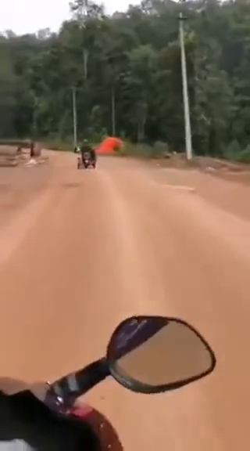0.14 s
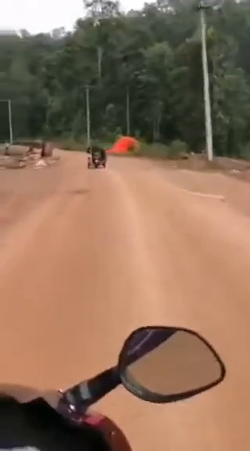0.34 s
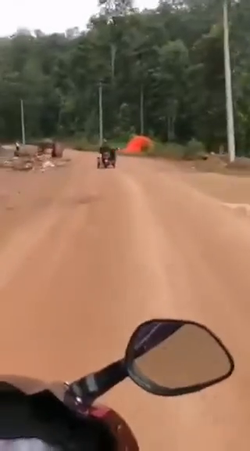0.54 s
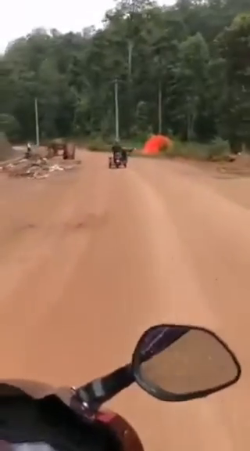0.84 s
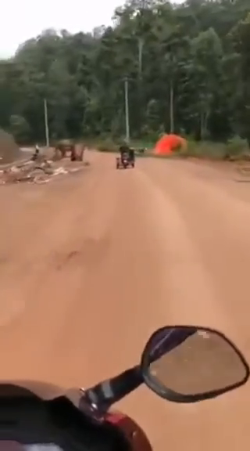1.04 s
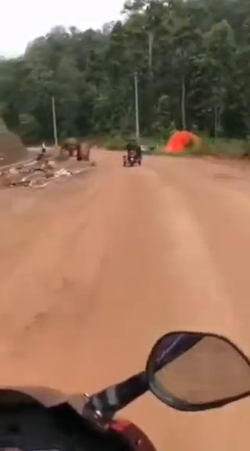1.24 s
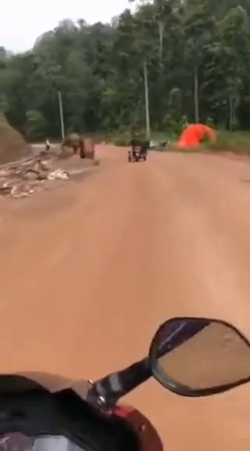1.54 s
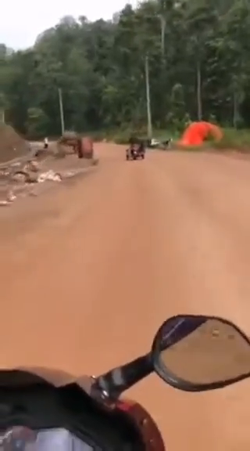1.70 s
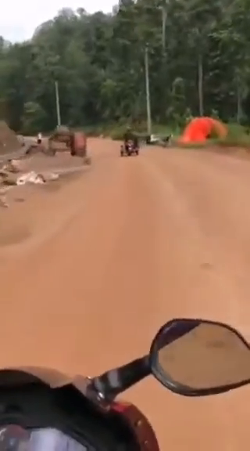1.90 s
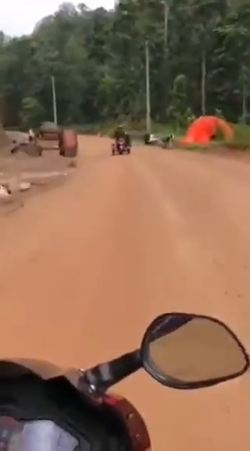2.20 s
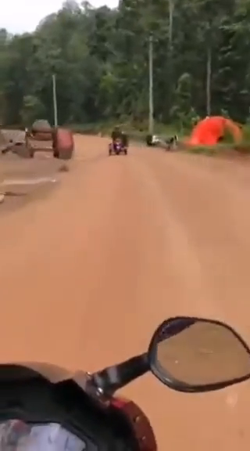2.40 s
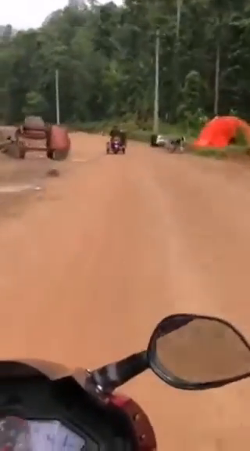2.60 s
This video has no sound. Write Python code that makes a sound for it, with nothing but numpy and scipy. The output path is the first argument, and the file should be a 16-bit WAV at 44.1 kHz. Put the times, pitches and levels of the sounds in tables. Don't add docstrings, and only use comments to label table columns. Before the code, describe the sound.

Rough gusts thud and crackle on an exposed phone microphone, outdoors on a dirt road. A small motorcycle engine buzzes underneath, easing off midway and pulling gently near the end, with tyre hiss and thin squeaks.

```python
import sys
import numpy as np
from scipy import signal
from scipy.fft import rfft, irfft, next_fast_len
from scipy.io import wavfile
from scipy.ndimage import uniform_filter1d, map_coordinates

SR = 44100
rng = np.random.default_rng(int(sys.argv[2]) if len(sys.argv) > 2 else 0)


def gain_from_db(level_db):
    decades = np.asarray(level_db, float) / 20
    return 10 ** decades


def wrap_up_sound(samples):
    columns = np.atleast_2d(samples).T
    tamed = np.clip(columns, -1, 1)
    steps = np.round(tamed * 32767).astype(np.int16)
    wavfile.write(sys.argv[1], SR, steps)


N = 121275


def unit(x):
    return x / np.sqrt(np.mean(x ** 2) + 1e-20)


def along(points, hz):
    f, v = np.transpose(points)
    return np.interp(np.log(hz + 1), np.log(f + 1), v)


def curves(rows):
    s, *columns = np.transpose(rows)
    return [np.interp(np.arange(N) / SR, s, column) for column in columns]


def wobble(rate):
    return map_coordinates(rng.standard_normal(2000), [np.arange(N) * rate / SR])


def filtered(x, response):
    m = next_fast_len(N + SR // 2)
    return irfft(rfft(x, m) * response(np.fft.rfftfreq(m, 1 / SR)), m)[:N]


def resonances(table):
    def response(f):
        total = 0
        for k, (centre, width, db) in enumerate(table):
            mode = 1j * f * width / (centre * centre - f * f + 1j * f * width)
            total = total + (-1) ** k * gain_from_db(db) * mode
        return total
    return response


def smoothed(x, first, second):
    return uniform_filter1d(uniform_filter1d(x, size=first), size=second)


def rush(spectrum, patchy_db):
    z = signal.stft(rng.standard_normal(N), nperseg=512)[2]
    field = uniform_filter1d(rng.standard_normal(z.shape), size=6, axis=0)
    field = uniform_filter1d(field, size=12, axis=1)
    x = signal.istft(z * gain_from_db(patchy_db * unit(field)), nperseg=512)[1][:N]
    return unit(filtered(x, lambda hz: gain_from_db(along(spectrum, hz))))


def superposed(seconds, wave):
    at = np.clip(np.round(seconds * SR).astype(int), 0, N)
    return np.bincount(at.ravel(), wave.ravel(), N + 1)[:N]


def chirps(s, db, start_hz, fall_s):
    end_hz = 85
    peak, tail = 2.1, 1.7
    t = np.arange(SR // 25)[None] / SR
    s, db, start_hz, fall_s = [np.asarray(v)[:, None] for v in (s, db, start_hz, fall_s)]
    turns = end_hz * t + (start_hz - end_hz) * fall_s * (1 - np.exp(-t / fall_s))
    u = t / fall_s
    rise = np.sin(.5 * np.pi * np.minimum(u / peak, 1))
    shape = np.where(u < peak, rise, np.exp(-(u - peak) / tail))
    rough = unit(smoothed(rng.standard_normal((len(s), 2, t.size)), 90, 70))
    turns = turns + .055 * rough[:, 0]
    shape = shape * gain_from_db(1.8 * rough[:, 1]) * np.cos(.5 * np.pi * t / t.max())
    wave = gain_from_db(db) * shape * np.sin(2 * np.pi * (turns + rng.random(s.shape)))
    return superposed(s + t, wave)


def engine():
    # (time [s], firing rate [1/s], level [dB])
    throttle = [
        (0, 30.7, -31),
        (.2, 34.8, -30.5),
        (.6, 32.1, -28.5),
        (1.1, 35.3, -28),
        (1.2, 34, -41.5),
        (1.7, 27.4, -44.5),
        (2.25, 27, -44),
        (2.4, 32, -30.5),
        (2.75, 21.3, -44.5),
    ]
    rate, throttle_db = curves(throttle)
    cycle = np.cumsum(rate * (1 + .0034 * wobble(30))) / SR
    thump = exhaust_note(cycle, throttle_db)
    return gain_from_db(throttle_db) * thump + gas_noise(cycle) + clatter(cycle, throttle_db)


def exhaust_note(cycle, throttle_db):
    # (centre [Hz], width [Hz], level [dB])
    modes = [(61, 18.5, 8.5), (158, 63, -5.5), (224.6, 20, 2), (422, 18.6, -1), (512.5, 57, -4),
             (858, 89, -7.5), (1178, 82, -5)]
    # (multiple, level over the thump [dB])
    orders = [(2, -2.5), (4, -12.5), (7, -2.5), (12, -9.5), (15, -9.5), (33, -9), (35, -15.5)]
    fire = np.diff(np.floor(cycle), prepend=0) * gain_from_db(1.9 * wobble(29))
    thump = unit(filtered(fire, resonances(modes)))
    below_full_db = throttle_db - throttle_db.max()
    for k, db in orders:
        order_db = db + 2 * wobble(5.2) + .8 * (k > 2) * below_full_db
        thump += gain_from_db(order_db) * np.sin(2 * np.pi * k * cycle + k)
    return thump


def gas_noise(cycle):
    # (centre [Hz], width [Hz], level [dB])
    upper_modes = [(1150, 20, -2.5), (1476, 38, -6.5), (1730, 47, -4.5), (2048, 53, -9.5)]
    swell = np.exp(.29 * np.cos(2 * np.pi * cycle))
    gas = unit(filtered(rng.standard_normal(N) * swell, resonances(upper_modes)))
    return gas * gain_from_db(-39.5 + 1.6 * wobble(7))


def clatter(cycle, throttle_db):
    # (frequency [Hz], level [dB])
    spectrum = [(1500, -36.5), (2500, 4.5), (4800, -30), (6950, -5), (9000, -1.5)]
    swell = np.exp(.54 * np.cos(2 * np.pi * cycle) + .15 * np.cos(4 * np.pi * cycle))
    noise = unit(rush(spectrum, patchy_db=1.6) * swell)
    load_db = .35 * (throttle_db - throttle_db.mean())
    return gain_from_db(-40 + load_db) * noise


def wind():
    # (time [s], strength [dB])
    gusts = [(0, -18.5), (.06, -33), (.11, -15), (.24, -27), (.47, -17.5), (.6, -31.5), (.69, -14.5),
             (.8, -37), (1.14, -22.5), (1.36, -17), (1.44, -15.5), (1.48, -52), (1.74, -21.5), (1.93, -22),
             (1.99, -35), (2.2, -14.5), (2.41, -22.5), (2.54, -17.5)]
    gust_db, = curves(gusts)
    total = buffeting(gust_db) + small_eddies(gust_db) + port_flaps() + big_pops()
    return filtered(total, lambda f: 1 / (1 + (f / 1700) ** 6))


def buffeting(gust_db):
    # (frequency [Hz], level [dB])
    spectrum = [(20, -31.5), (40, 13), (70, 5.5), (130, -5), (250, -14), (500, -27.5), (1500, -50)]
    body = filtered(rush(spectrum, patchy_db=-1.5), lambda f: 1 / (1 + (f / 500) ** 4))
    lumps_db = 1.2 * wobble(21.825) + 1.8 * wobble(70)
    return unit(body * gain_from_db(lumps_db)) * gain_from_db(gust_db - 3.5)


def small_eddies(gust_db):
    eddies_per_s = 80
    draw = rng.random((400, 4))
    s = np.cumsum(-np.log(draw[:, 0])) / eddies_per_s
    here_db = gust_db[np.clip((s * SR).astype(int), 0, N - 1)]
    size = -np.log(draw[:, 1])
    db = here_db - 2 + 2.3 * (np.minimum(size, 2.5) - 1)
    start_hz = 753 * np.exp(1.907 * (draw[:, 2] - .5))
    fall_s = .002065 * (.5 + draw[:, 3])
    return chirps(s, db, start_hz, fall_s)


def tyres():
    # (time [s], level [dB])
    rolling = [
        (0.0, -27),
        (.55, -26.5),
        (1.12, -26),
        (1.38, -31),
        (1.6, -29.5),
        (1.91, -28.5),
        (2.3, -29),
        (2.75, -28.5),
    ]
    # (frequency [Hz], level [dB])
    road = [(18, -9.5), (30, 14.5), (80, 1), (323, -4.5), (700, -7.5), (1180, -13), (1300, -14),
            (2050, -17.5), (9300, -29), (12100, -52), (20500, -120)]
    level_db, = curves(rolling)

    def high(f):
        return (f / 3000) ** 4 / (1 + (f / 3000) ** 4)

    roll = filtered(rush(road, patchy_db=1.18), lambda f: np.sqrt(1 - high(f)))
    grit = filtered(rush(road, patchy_db=.8), lambda f: np.sqrt(high(f)))
    grit = grit * gain_from_db(.75 * (wobble(18) + wobble(35)))
    return (roll + grit) * gain_from_db(level_db + 5.5 + .2 * wobble(4.8))


def port_flaps():
    # (start [s], length [s], peak level [dB], centre [Hz])
    flaps = [(0.08, 0.0078, -23, 308), (0.197, 0.014, -24, 483), (0.474, 0.015, -15.5, 550),
             (0.512, 0.018, -25, 297), (.598, 0.011, -20, 437), (.626, 0.013, -22, 930),
             (0.662, 0.0084, -19, 1070), (.688, 0.01, -22, 1187), (0.701, 0.023, -14.5, 415),
             (0.751, 0.0073, -33, 410), (.815, 0.017, -18.5, 413), (.85, 0.049, -19, 147.7),
             (.897, 0.015, -30, 300), (0.982, 0.015, -20, 296), (1.247, 0.0063, -13.5, 700),
             (1.25, 0.018, -11, 111), (1.307, .006, -15, 1250), (1.322, 0.0086, -25, 890),
             (1.328, 0.045, -13.5, 83.7), (1.367, .04, -12.5, 84.5), (1.424, 0.022, -12.5, 107),
             (1.361, 0.0096, -16, 603), (1.55, 0.064, -23, 88), (1.683, 0.0059, -19, 800),
             (1.767, 0.026, -16, 79), (1.801, 0.046, -16.5, 119), (1.843, 0.0237, -22.5, 247),
             (1.862, .035, -17, 106), (1.928, 0.032, -11, 76), (1.953, 0.0057, -17, 980),
             (1.955, 0.021, -12.5, 228), (2.01, 0.024, -14, 74.5), (2.106, 0.011, -27.5, 1100),
             (2.13, 0.069, -19, 151.5), (2.197, 0.0048, -16, 840), (2.203, 0.011, -21, 800),
             (2.236, 0.0084, -20, 900), (2.256, 0.022, -16, 108), (2.44, 0.047, -20.5, 154),
             (2.485, .04, -20, 216.5), (2.56, 0.02, -15.5, 146)]
    s, length, db, hz = np.transpose(flaps)[:, :, None]
    knots = 3000
    rough = unit(smoothed(rng.standard_normal((len(s), 2, knots)), 500, 300))
    t = np.arange(SR // 12)[None] / SR
    part = np.clip(t / length, 0, 1)
    index = (part[:, None] * (knots - 1)).astype(int)
    wander, grain = np.take_along_axis(rough, index, axis=2).transpose(1, 0, 2)
    swell = np.sin(np.pi * part ** .65)
    wave = gain_from_db(db + 1.8 * grain) * swell * np.sin(2 * np.pi * (hz * t + .16 * wander))
    return superposed(s + t, wave)


def big_pops():
    # (start [s], peak level [dB], start pitch [Hz], pitch fall time [s])
    pops = [(.097, -9.5, 427, 0.0034), (0.278, -12, 890, 0.0023), (.457, -12, 884, 0.0032),
            (0.479, -15.5, 1190, 0.0031), (0.662, -14, 695, 0.0028), (.677, -9.5, 790, 0.0024),
            (1.226, -15, 1306, 0.0026), (1.25, -15, 500, 0.0021), (1.287, -18.5, 1080, 0.0033),
            (1.309, -8, 1130, 0.0034), (1.32, -11, 1100, 0.0014), (1.349, -13, 920, 0.0027),
            (1.365, -7, 688, 0.003), (1.329, -13.5, 191, 0.0065), (0.726, -16, 230, 0.0048),
            (1.784, -11.5, 335, 0.0045), (1.904, -12.5, 257, 0.0079), (1.421, -8, 576, 0.0042),
            (1.578, -16, 414, 0.004), (1.683, -16, 895, 0.00244), (1.77, -10, 720, 0.0017),
            (1.954, -11.5, 1010, 0.0029), (2.015, -20, 320, 0.0021), (2.2, -12, 697, 0.0025),
            (2.222, -6.5, 2595, 0.0019), (2.241, -21.5, 500, 0.0026), (2.475, -14.5, 880, 0.0031),
            (2.537, -12, 500, 0.0033), (0.648, -14, 615, 0.0032)]
    s, db, start_hz, fall_s = np.transpose(pops)
    return chirps(s - .00014, db, start_hz, fall_s)


def brake_squeal():
    # (start [s], length [s], level [dB], start pitch [Hz], glide [Hz])
    squeals = [(.26, .08, -52, 3950, 0), (1.81, .015, -41, 4250, 100), (1.832, .025, -39.5, 4130, 120),
               (1.865, .035, -40, 4170, -150), (1.915, .02, -43, 4000, 150), (1.95, .03, -41.5, 4020, 100),
               (1.99, .022, -36.5, 4030, 80), (2.008, .022, -40, 4120, 220), (2.035, .015, -44, 4050, 60),
               (2.085, .025, -40.5, 3950, 200), (2.11, .022, -39, 4040, 220), (2.133, .028, -36, 4140, -50),
               (2.18, .018, -39, 4050, 130), (2.213, .032, -37, 3950, 300), (2.25, .02, -43, 4150, 120),
               (2.586, .027, -34.5, 3080, 200), (1.825, .025, -42, 3400, 0), (1.9, .015, -42, 3780, 0)]
    t, out = np.arange(N) / SR, np.zeros(N)
    for s, length, db, hz, glide_hz in squeals:
        part = np.clip((t - s) / length, 0, 1)
        pitch = hz + glide_hz * part + 25 * wobble(150)
        tone = np.sin(2 * np.pi * np.cumsum(pitch) / SR)
        swell = np.sqrt(np.abs(np.sin(np.pi * part)))
        out += gain_from_db(db + 1.5 * wobble(70)) * tone * swell
    return out


def thinned(x):
    # (frequency [Hz], level relative to the local mean [dB])
    thresholds = [(2200, -13), (3200, -8), (4500, -4.6), (9000, -2.4)]
    hz, t, z = signal.stft(x, SR, nperseg=2048, noverlap=1536)
    power = np.abs(z) ** 2
    near = uniform_filter1d(uniform_filter1d(power, size=3, axis=0), size=3, axis=1)
    wide = uniform_filter1d(uniform_filter1d(power, size=64, axis=0), size=12, axis=1)
    wander = np.repeat(rng.standard_normal(len(t) // 5 + 1), 5)[:len(t)]
    edge_hz = 8990 + 105 * wander
    strong = near > wide * gain_from_db(2 * along(thresholds, hz))[:, None]
    keep = strong & (hz[:, None] < edge_hz)
    return signal.istft(z * keep, SR, nperseg=2048, noverlap=1536)[1][:N]


def scene():
    return (engine() + wind() + tyres() + brake_squeal())[None]


def roll_off(x):
    return signal.sosfilt(signal.butter(12, 9530, fs=SR, output="sos"), x)


def record(dry):
    # (centre [Hz], width [Hz], depth [dB])
    dips = [(4550, 150, -2), (5500, 90, -5), (6500, 110, -3.5), (7250, 110, -3.5), (7800, 100, -3),
            (8650, 150, -4)]

    def response(f):
        port_db = sum(db * np.exp(-.5 * ((f - hz) / width) ** 2) for hz, width, db in dips)
        bass_cut = (f / 59.4) ** 4 / (1 + (f / 59.4) ** 4)
        return gain_from_db(port_db) * bass_cut

    mix = thinned(filtered(dry[0], response))[None]
    return roll_off(mix)


dry = scene()
out = record(dry)
wrap_up_sound(out)
```